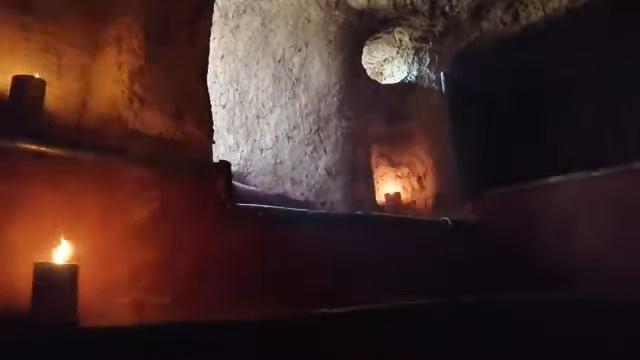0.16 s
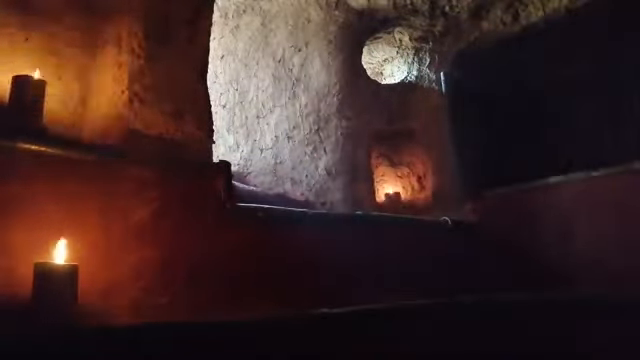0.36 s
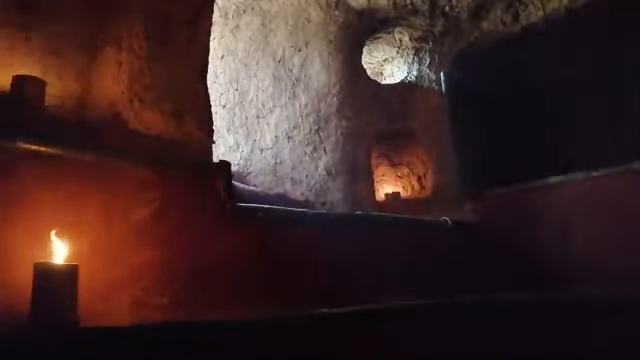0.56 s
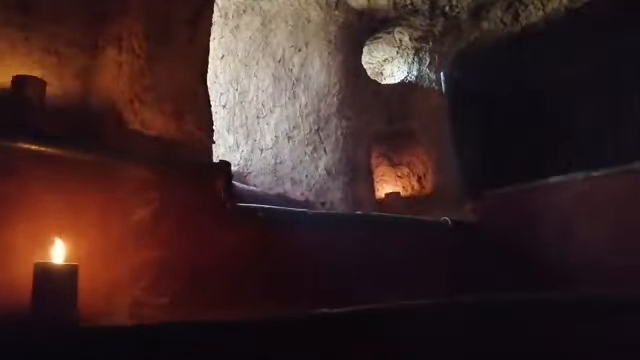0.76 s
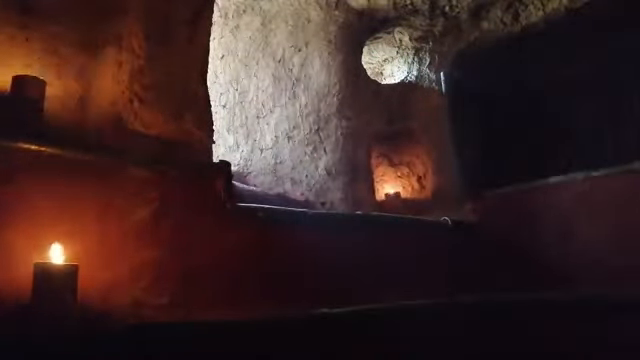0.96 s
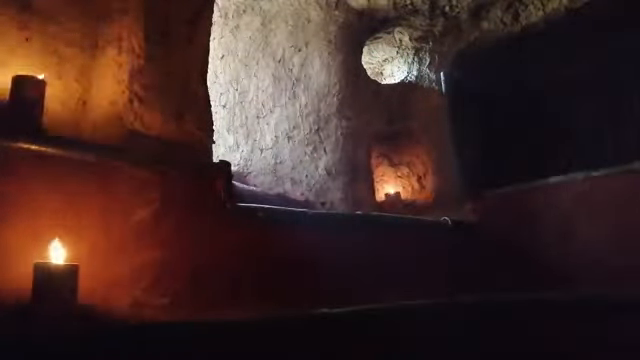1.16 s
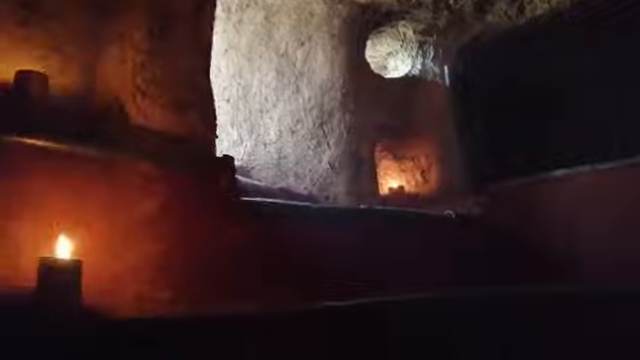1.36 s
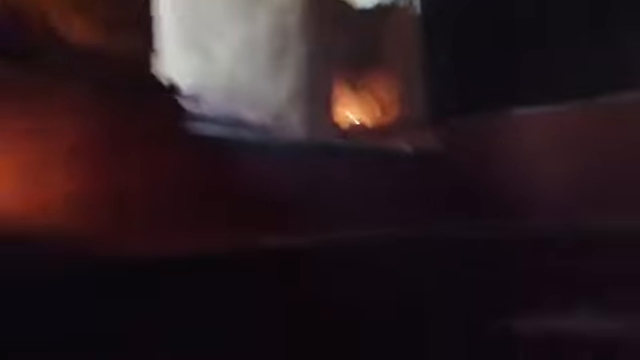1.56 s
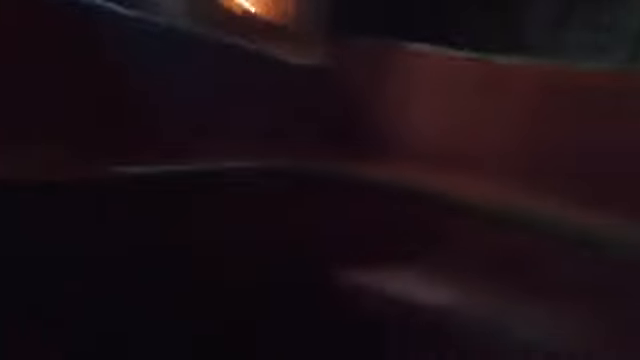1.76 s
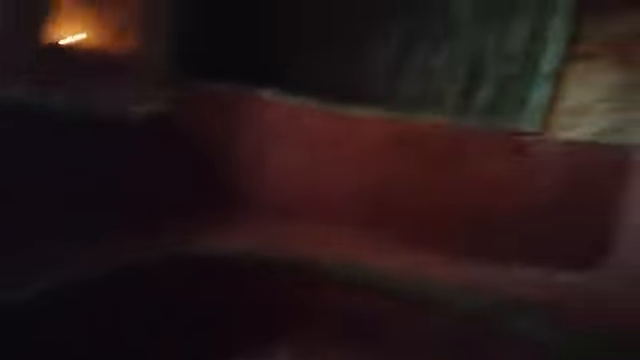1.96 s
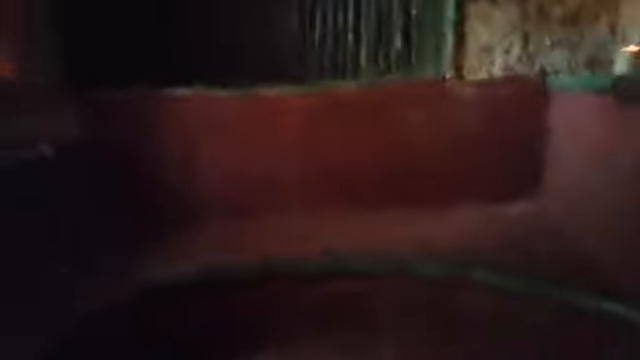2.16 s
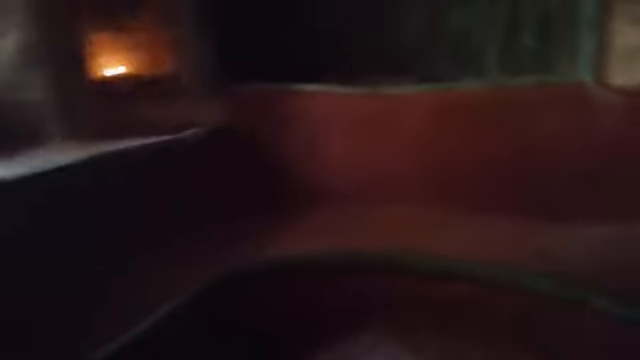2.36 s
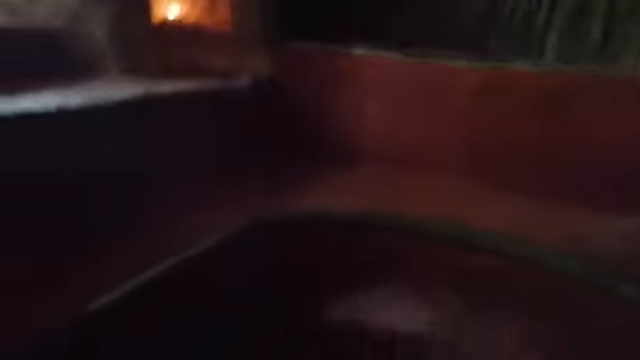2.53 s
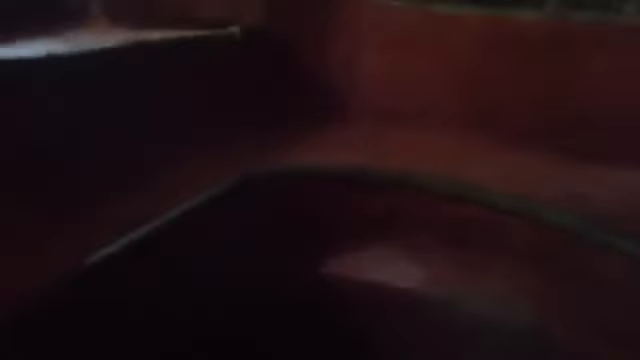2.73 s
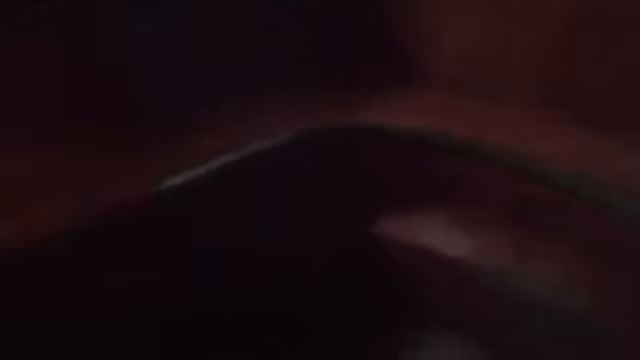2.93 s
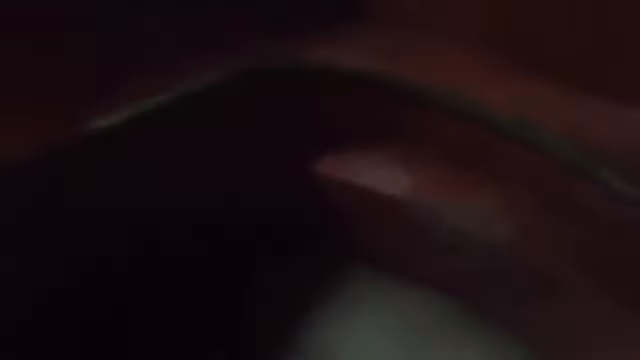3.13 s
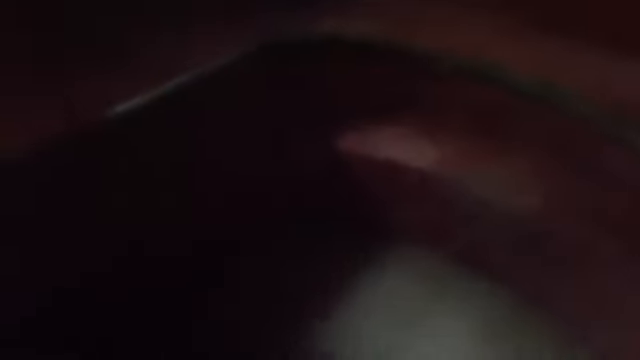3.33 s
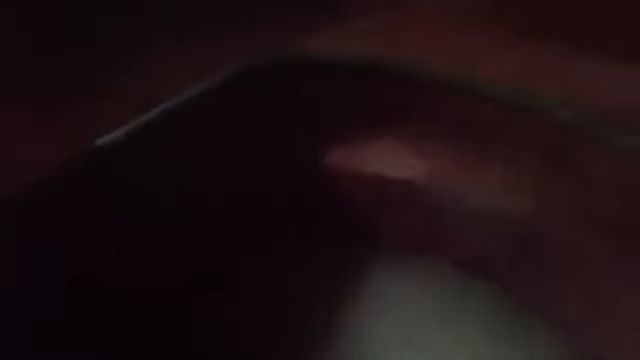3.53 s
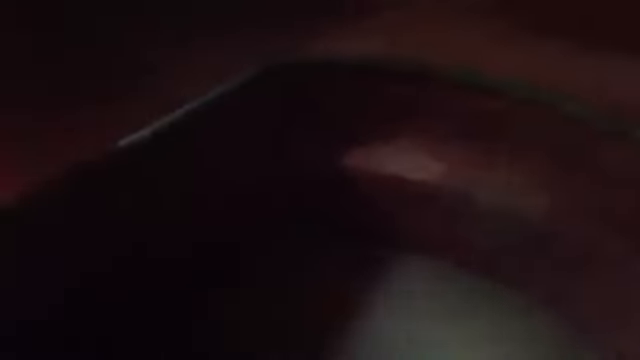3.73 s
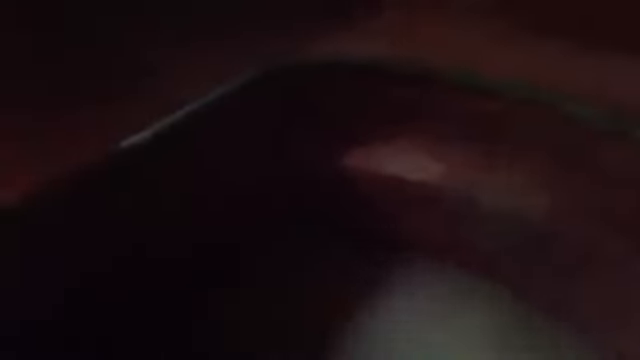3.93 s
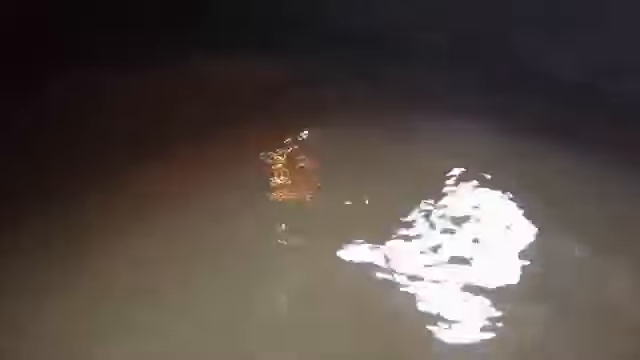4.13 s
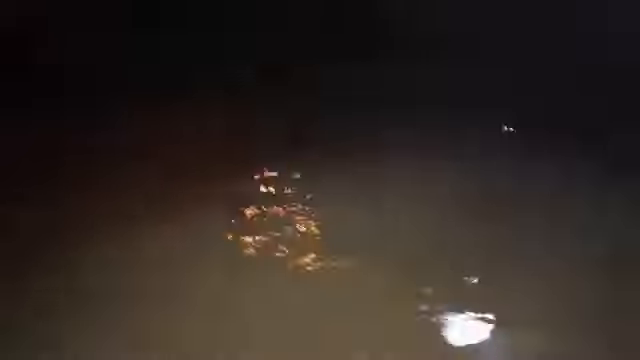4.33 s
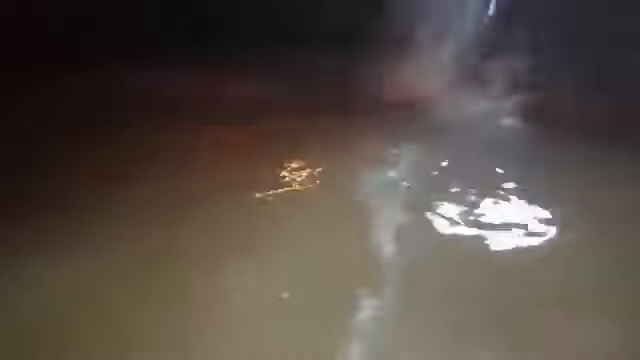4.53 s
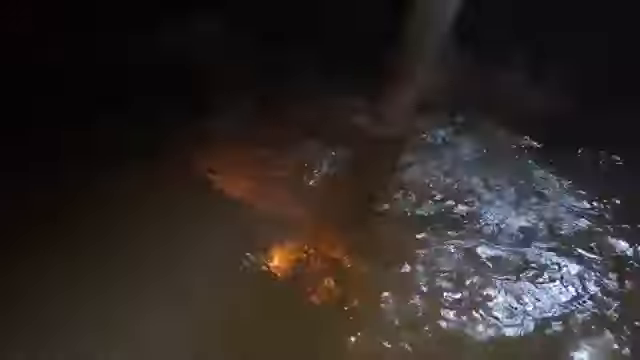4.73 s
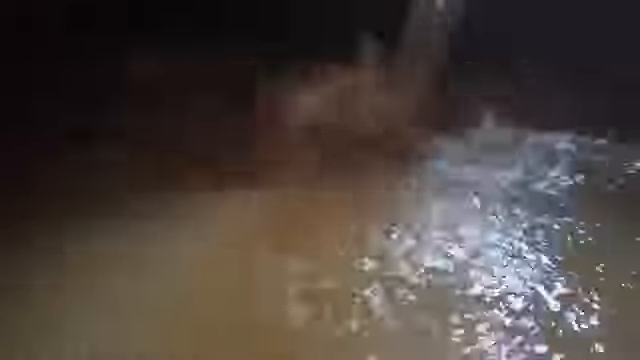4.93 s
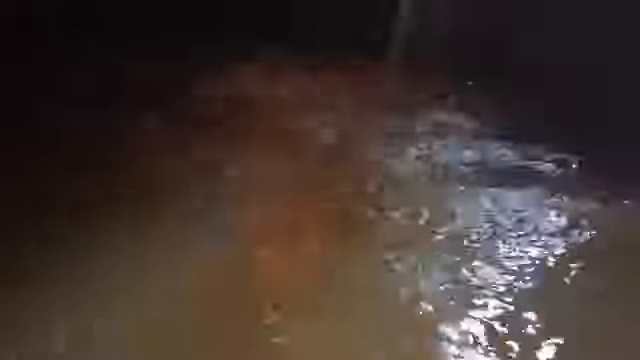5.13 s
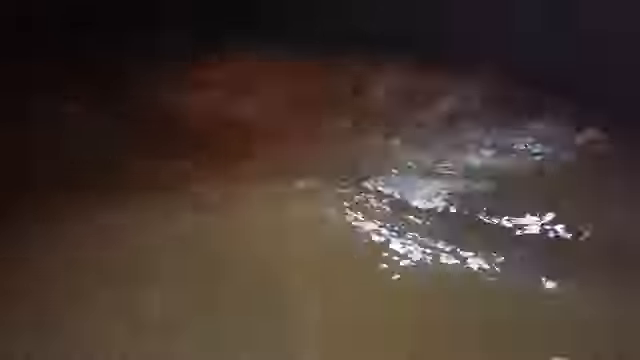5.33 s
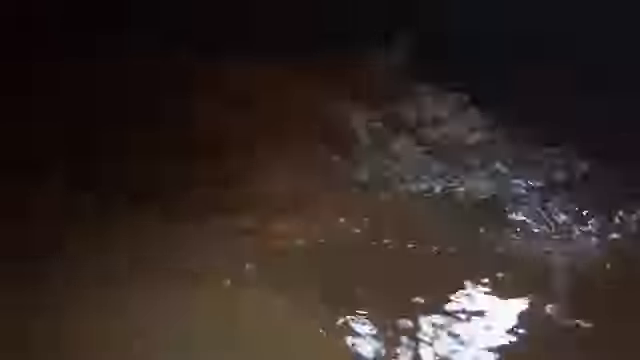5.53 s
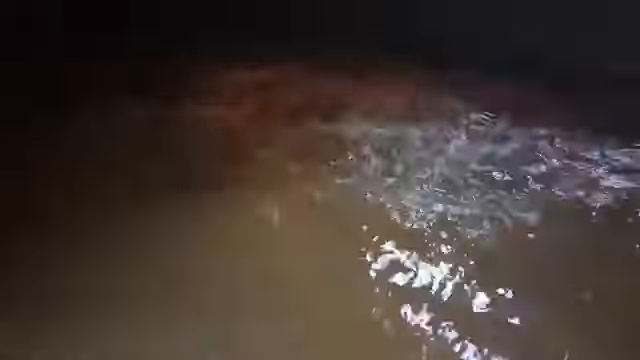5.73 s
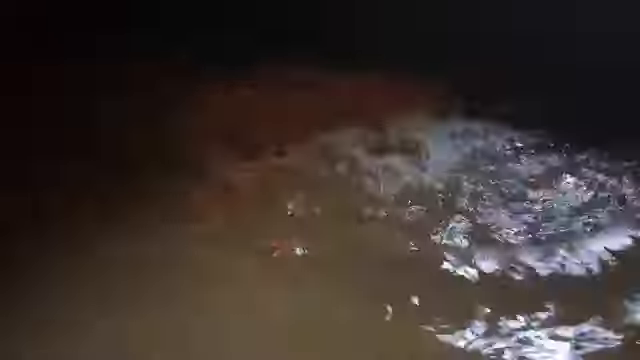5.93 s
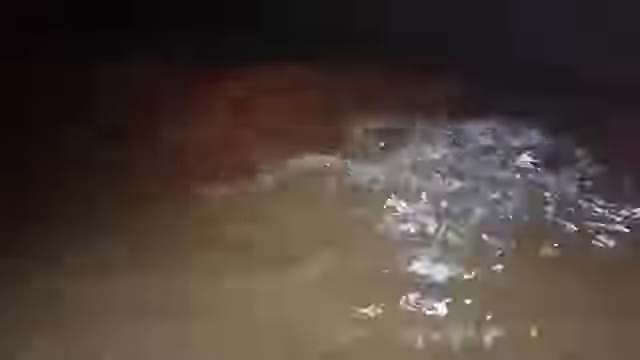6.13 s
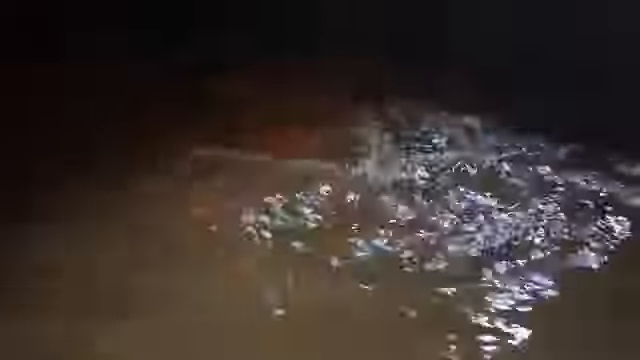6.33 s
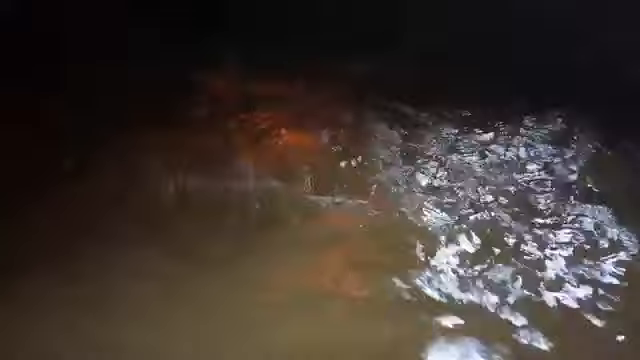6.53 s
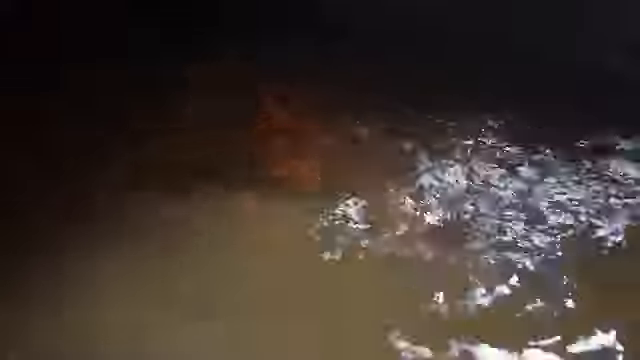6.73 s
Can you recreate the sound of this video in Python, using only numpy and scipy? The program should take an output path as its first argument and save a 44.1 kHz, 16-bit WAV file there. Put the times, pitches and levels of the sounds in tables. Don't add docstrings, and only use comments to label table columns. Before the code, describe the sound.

Close handheld sound in a small, hard stone room. After a quiet start with a faint finger squeak, irregular splashes and rising bubble blips bounce around, with dull handling bumps. A tiny gap of silence follows, then a few drips. Suddenly a dense rush of water lands, deep and gurgling, by far the loudest moment, then falls away quickly to trickles, single plops and soft fizz.

```python
import sys
import numpy as np
from scipy import signal
from scipy.fft import rfft, irfft
from scipy.io import wavfile
from scipy.ndimage import uniform_filter1d

SR = 44100
rng = np.random.default_rng(int(sys.argv[2]) if len(sys.argv) > 2 else 0)


def amplitude_ratio(level_db):
    exponent = np.asarray(level_db, float) / 20
    return 10 ** exponent


def waveform_to_disk(signal):
    frames = np.transpose(np.atleast_2d(signal))
    scaled = np.clip(frames, -1, 1) * 32767
    samples = np.round(scaled).astype(np.int16)
    wavfile.write(sys.argv[1], SR, samples)


N = 303496

# start t/s, hold t/s, bubble level/dB,
# spray over bubbles/dB, favoured f/Hz
STROKES = [(1.264, .06, -57.5, -16, 2000), (1.345, .17, -45.5, -14, 1900), (1.775, 0.09, -44, -13, 1410),
           (1.881, 0.14, -45, -1.5, 1930), (2.051, .19, -46, -0.5, 1850), (2.299, 0.021, -42, -8.5, 1600),
           (2.407, 0.17, -48, 2, 2000), (2.496, 0.027, -42.5, -9, 2700), (2.645, 0.074, -46, -5.5, 2800),
           (2.796, 0.071, -60, 8, 1510), (2.902, 0.051, -53.5, 5.5, 2100),
           (3.004, 0.069, -43.5, -6.5, 1810), (3.146, 0.065, -55.5, 4.5, 2100),
           (3.232, 0.077, -46.5, -2, 2400), (3.495, 0.036, -59, -5, 1900), (3.57, 0.029, -60, 13.5, 2200),
           (3.634, 0.1, -51, 5.5, 2500), (3.78, 0.25, -47, -3.5, 1700), (3.974, 0.092, -41.5, -6.5, 1820),
           (4.375, 0.016, -48, -10.5, 1720), (4.403, 0.29, -58, -4, 2200),
           (5.435, 0.042, -37.5, -5.5, 1500), (5.51, 0.013, -42, 1, 2800),
           (5.714, 0.031, -48.5, -3.5, 1590), (5.619, 0.057, -41, -7.5, 2140),
           (6.025, 0.039, -53.5, -19, 1300), (6.439, 0.088, -59.5, -17, 1200)]
# t/s, level/dB
POUR = [
    (4.54, -44.5),
    (4.572, -29.5),
    (4.62, -23.5),
    (4.98, -23.5),
    (5.05, -28.5),
    (5.43, -28),
    (5.47, -41),
    (5.77, -53),
    (6.02, -62),
]
POUR_START_S = POUR[0][0]
# f/Hz, width/Hz, left-right likeness (0-1)
LOW_MODES = [(52, 20, 0.99), (111.5, 100, 1), (270, 380, 0.28)]
# f/Hz, phase each way/rad
SIDE_PHASE = [(55, 0.059), (75, 0.55), (110, 0.59), (145, 0.3), (350, 0.72)]
# fade start t/s, silence t/s, sound back t/s
SCENE_CHANGE = (3.992, 4.036, 4.11)
ATTACK_S = 0.011
DIE_DB_PER_S = 261


def evened(x):
    return x / np.sqrt(np.mean(x ** 2) + 1e-20)


def read(points, hz):
    f, value = np.transpose(points)
    return np.interp(np.log(hz + 1), np.log(f + 1), value)


def follow(tables, t):
    rows = np.vstack(tables)
    s, *columns = rows[np.argsort(rows[:, 0])].T
    return [np.interp(t, s, c) for c in columns]


def during(table, t):
    outside = (t < table[0][0]) | (t > table[-1][0] + .01)
    return np.where(outside, -200, follow([table], t)[0])


def add(mix, s, pan_db, sound):
    part = mix[:, round(s * SR):][:, :sound.shape[-1]]
    part += amplitude_ratio(np.array([[pan_db / 2], [-pan_db / 2]])) * sound[..., :part.shape[1]]


def churn(per_s=140, cycles=22, spread_db=3.5, favour_db=11.0, favour_octaves=0.41, clump_db=7.0, wet_db=-1.5):
    # f/Hz, density/(dB per Hz)
    cloud = [(260, -39), (450, -9), (680, -5.5), (1050, -4.5), (1480, -11), (1690, -8.5), (2700, -8),
             (3400, -9), (4570, -11.5), (5610, -12), (8460, -18.5), (11300, -18), (12100, -26.5),
             (15000, -46)]
    # t/s, scatter (0-1)
    scatter_curve = [
        (0, 0.05),
        (1.6, 0.14),
        (1.8, 1.01),
        (4.45, 0.51),
        (4.6, 0.26),
        (5.36, 0.26),
        (5.47, 0.77),
        (5.6, 0.42),
        (5.9, 0.57),
        (6.88, 0.22),
    ]
    pitches = np.geomspace(450, 14000, 50)
    coarse = np.arange(0, N + 256, 256) / SR
    scatter, = follow([scatter_curve], coarse)
    near = np.log2(pitches[:, None] / activity(coarse)[1]) / favour_octaves
    clumps = uniform_filter1d(rng.standard_normal(near.shape), size=2, axis=0)
    clumps = evened(uniform_filter1d(clumps, size=7, axis=1))
    share_db = favour_db * scatter * np.exp(-near ** 2 / 2) + clump_db * scatter * clumps
    weight = amplitude_ratio(share_db + read(cloud, pitches)[:, None]) * np.sqrt(pitches[:, None])
    group = np.searchsorted([1250, 2600, 4000], pitches)
    for g in range(4):
        weight[group == g] /= np.linalg.norm(weight[group == g], axis=0)
    rarity = -np.log(np.linspace(.01, 1, 100))
    weight /= np.sqrt(np.mean(amplitude_ratio(2 * spread_db * scatter[:, None] * rarity), axis=1))

    swarms = np.zeros((4, 2 * N + SR))
    for hz, w, g in zip(pitches, weight, group):
        where, side, chance, luck = rng.random((4, int(N / SR * 1500)))
        born = chance < per_s * np.sqrt(hz / 1000) / 1500
        s = where[born] * N / SR
        size_db = -spread_db * np.interp(s, coarse, scatter) * np.log(np.maximum(luck[born], .01))
        size = amplitude_ratio(size_db) * np.interp(s, coarse, w)
        ring = bubble(hz, .4, cycles / hz)
        at = (s * SR).astype(int) + N * (side[born] > .5)
        sound = np.outer(size, ring) / np.linalg.norm(ring) / np.sqrt(len(s) + 1)
        index = at[:, None] + np.arange(len(ring))
        swarms[g] += np.bincount(index.ravel(), sound.ravel(), swarms.shape[1])
    swarms = swarms[:, :2 * N].reshape(4, 2, N)

    fine = np.arange(0, N + 96, 96) / SR
    large, middle, spray = activity(fine)[0]
    sizes_db = [large, middle, (middle + spray) / 2, spray]
    out = np.zeros((2, N))
    for db, trim_db, x in zip(sizes_db, [6.5, 0.5, -2.0, 0.5], swarms):
        level_db = np.interp(np.arange(N) / SR, fine, db + trim_db)
        out += amplitude_ratio(level_db) * evened(x + amplitude_ratio(wet_db) * room(x))
    return out


def activity(t):
    # start t/s, hold t/s, level/dB
    laps = [
        (0, 0.036, -65.5),
        (0.192, 0.047, -71),
        (0.588, 0.21, -74.5),
        (0.976, 0.28, -70.5),
        (1.75, 0.026, -63.5),
    ]
    # t/s, level/dB
    foam_curve = [
        (5.5, -56),
        (5.84, -54.5),
        (6.45, -60),
        (6.7, -69.5),
        (6.88, -71),
    ]
    lap_spray_db, lap_hz, still_db = -1.5, 2100, -83
    spray_die_db_per_s, large_lag_s = 205, 0.041
    early_s, early_large_db = 1.6, 8
    still = still_db + 0 * t
    parts = [(still - 3.5, still, still, lap_hz)]
    for s, hold, db, spray_db, hz in STROKES + [(s, hold, db, lap_spray_db, lap_hz) for s, hold, db in laps]:
        large_db = db - 20.5 + early_large_db * (s < early_s) - np.log2(hz / 1500)
        large = large_db + stroke(t, s, hold, DIE_DB_PER_S, large_lag_s)
        middle = db + stroke(t, s, hold, DIE_DB_PER_S)
        spray = db + spray_db + stroke(t, s, hold, spray_die_db_per_s)
        parts.append((large, middle, spray, hz))

    flow, foam = during(POUR, t), during(foam_curve, t)
    age = t - POUR_START_S
    lead = np.exp(-abs(age) / 0.14)
    pour_large = flow - 5 - 4.5 * age - 15 * lead
    parts.append((pour_large, flow, flow - 9.5 + 14.5 * lead, 1650))
    foam_spray = -55.5 + 0.43 * (foam - foam_curve[0][1])
    parts.append((foam - 17.5, foam, foam_spray, 2300))

    power = amplitude_ratio(2 * np.array([p[:3] for p in parts]))
    favoured_hz = np.array([p[3] for p in parts]) @ power[:, 1] / power[:, 1].sum(0)
    return 10 * np.log10(power.sum(0)), favoured_hz


def stroke(t, start, hold, die, attack=ATTACK_S):
    jump_db, gather_db_per_s, sink_db_per_s = 10.5, 503.5, 3
    age = t - start
    rise = -jump_db * np.clip(1 - age / attack, 0, 1) + gather_db_per_s * np.minimum(age, 0)
    db = rise - sink_db_per_s * np.clip(age, 0, hold) - die * np.maximum(age - hold, 0)
    return np.where((start < SCENE_CHANGE[1]) & (t > SCENE_CHANGE[1]), -200, db)


def bubble(hz, rise, t60):
    t = np.arange(int(t60 * SR) + 8) / SR
    turns = np.cumsum(np.minimum(hz * 2 ** (rise * t / t60), 16000)) / SR
    return np.sin(2 * np.pi * turns) * amplitude_ratio(-60 * t / t60) * (1 - np.exp(-t * hz / 1.36))


def surge():
    # t/s, peak level/dB, f/Hz, swell t/s, length t/s
    gulps = [(4.619, -30.5, 356, 0.035, 0.21), (4.63, -27, 141.5, 0.042, 0.13),
             (4.636, -29, 177.6, .04, 0.19), (4.93, -30.5, 177, .03, 0.2), (4.8, -28.5, 101, 0.026, 0.14),
             (4.92, -19, 142.4, 0.036, 0.23), (5.21, -31, 180, 0.04, 0.16),
             (5.25, -30.5, 141.2, 0.066, 0.52), (5.407, -22, 53.8, 0.047, 0.25),
             (5.501, -31, 182.7, 0.017, 0.29), (5.502, -33, 78, 0.046, 0.18),
             (5.412, -28, 131, 0.015, 0.031)]
    hz, out = np.fft.rfftfreq(N, 1 / SR), np.zeros((2, N))
    coarse = np.arange(0, N + 128, 128) / SR
    turn = np.exp(1j * np.outer([-1, 1], read(SIDE_PHASE, hz)))
    for (f, width, same), db in zip(LOW_MODES, heave(coarse)):
        left, other = rng.standard_normal((2, N))
        same = np.clip(same, 0, 1)
        push = rfft([left, same * left + np.sqrt(1 - same ** 2) * other]) * turn
        boom = evened(irfft(push / (1 + (2 * (hz - f) / width) ** 4), N))
        out += amplitude_ratio(np.interp(np.arange(N) / SR, coarse, db)) * boom
    for s, db, f, swell, length in gulps:
        add(out, s, 0, amplitude_ratio(db) * gulp(f, swell, length))
    return out


def heave(t):
    # peak t/s, level/dB, centre f/Hz, swell t/s
    heaves = [(1.52, -47.5, 240, 0.093), (2.18, -38, 71, 0.044), (2.34, -59, 180, 0.3),
              (2.73, -46, 242, 0.23), (3.06, -44.5, 200, 0.13), (3.16, -56, 150, 0.11),
              (3.72, -62, 60, 0.23), (3.72, -68, 300, 0.056), (3.9, -57.5, 110, 0.073),
              (3.99, -64, 302, 0.1), (4.15, -67, 101, 0.088), (2.98, -48.5, 110, .06),
              (1.4, -48, 100, 0.11), (4.899, -33.5, 264, 0.18), (4.97, -34.5, 95, 0.051),
              (5.158, -36.5, 55, 0.092), (5.42, -34.5, 60, 0.084), (5.42, -36.5, 270, 0.041),
              (5.56, -36.5, 80.5, 0.17), (3.2, -52, 45, .6), (5.62, -37.5, 120, 0.23),
              (5.76, -49.5, 110, 0.27)]
    rests_db, settled_all_db = (-72.5, -63, -81.5), (-11, -2.5, 1)
    stirs_db, pours_db = (-15.5, -33.5, -19), (-37, -15, -13.5)
    swell_db, settle_db_per_s, reach_db = 15, 208.5, 7
    stir = sum(amplitude_ratio(2 * (db + stroke(t, s, hold, DIE_DB_PER_S))) for s, hold, db, _, _ in STROKES)
    wobble_db = 3 * evened(uniform_filter1d(rng.standard_normal(len(t)), size=40))
    lag_db = -40 * np.exp(-abs(t - POUR_START_S) / 0.05)
    levels = []
    for (f, _, _), rest_db, settled_db, stir_db, pour_db in zip(LOW_MODES, rests_db, settled_all_db,
                                                                stirs_db, pours_db):
        power = amplitude_ratio(2.04 * (rest_db + wobble_db + settled_db * (t > SCENE_CHANGE[1])))
        power = power + stir * amplitude_ratio(2 * stir_db)
        power = power + amplitude_ratio(2 * (during(POUR, t) + pour_db + lag_db))
        for s, db, hz, swell in heaves:
            settle = stroke(t, s - ATTACK_S, ATTACK_S, settle_db_per_s)
            shape = np.where(t < s, swell_db * (t - s) / swell, settle)
            shape = np.where((s > POUR_START_S) & (t < POUR_START_S), -200, shape)
            power = power + amplitude_ratio(2 * (db + shape - reach_db * np.log2(f / hz) ** 2))
        levels.append(10 * np.log10(power))
    return levels


def gulp(hz, swell, length):
    t = np.arange(int(length * SR)) / SR
    shape = np.interp(t, [0, swell, length], [0, 1, 0]) ** 1.6
    waver = np.sin(2 * np.pi * (11 * t + rng.random()))
    phase = read(SIDE_PHASE, hz) * np.array([[-1], [1]])
    return shape * (1 + 0.081 * waver) * np.sin(2 * np.pi * hz * t + 0.1 * waver + phase)


def drops():
    wet, body = np.zeros((2, 2, N))
    single_bubbles(wet)
    bubble_strings(wet)
    spray_ticks(wet)
    knocks(body)
    squeak(wet)
    cut = round(SCENE_CHANGE[1] * SR)
    echo = np.hstack([room(wet[:, :cut]), room(wet[:, cut:])])
    return wet + amplitude_ratio(-3.5) * echo + amplitude_ratio(3.0) * body + amplitude_ratio(7.0) * room(body)


def single_bubbles(mix):
    # t/s, peak level/dB, f/Hz, t60/s
    large = [(1.805, -29.5, 1340, 0.063), (1.835, -24.5, 1175, 0.061), (1.93, -33.5, 1500, 0.092),
             (2.129, -32, 1407, 0.072), (2.524, -30.5, 1354, 0.079), (3.494, -52.5, 1055, 0.062),
             (3.819, -37.5, 1150, 0.068), (3.94, -50, 620, 0.041), (4.367, -41.5, 1210, 0.072),
             (4.568, -23, 1383, 0.07), (6.029, -59, 767, 0.095), (5.67, -34.5, 1093, 0.077),
             (5.746, -41, 1330, 0.023), (6.515, -50, 930, .05)]
    close_pitched = [
        (3.303, -36.5, 848, 0.07),
        (3.858, -29.5, 1310, .045),
        (2.783, -37, 1030, .05),
        (6.448, -49, 1135, 0.055),
    ]
    climbing = [
        (2.413, -30.5, 623, 0.06),
        (2.788, -34.5, 1026, 0.06),
        (3.798, -30.5, 884, 0.063),
        (3.859, -32, 1300, 0.05),
        (5.562, -40, 588, 0.066),
        (6.05, -35, 770, 0.041),
        (6.455, -46, 1174, 0.092),
    ]
    small = [(1.699, -54.5, 2420, 0.05), (1.7836, -28.5, 1690, 0.038), (2.0679, -22.5, 1800, 0.029),
             (2.2084, -37.5, 3870, 0.054), (2.236, -28, 2620, 0.039), (2.2962, -27, 2010, 0.047),
             (2.305, -31, 3690, 0.042), (2.531, -22, 2650, 0.022), (2.663, -30.5, 2860, 0.05),
             (2.9629, -32.5, 1772, 0.058), (3.0451, -18, 1760, 0.019), (3.231, -32.5, 1850, 0.023),
             (3.5342, -33.5, 1886, 0.034), (3.5688, -44, 2040, 0.059), (3.6106, -29, 2220, 0.03),
             (3.646, -29, 2610, 0.044), (3.722, -33.5, 2220, 0.048), (3.7963, -36.5, 1974, 0.062),
             (3.852, -30, 3690, 0.041), (3.894, -26, 1817, 0.05), (4.27, -50, 1580, 0.049),
             (4.399, -38.5, 2310, 0.055), (4.5236, -38, 1870, 0.044), (6.32, -42, 1840, 0.031),
             (5.636, -15.5, 4990, 0.0088), (1.353, -30, 2340, 0.019), (2.53, -27, 3900, 0.012),
             (5.655, -30, 2410, 0.046), (5.743, -34.5, 2380, 0.054)]
    cluster(mix, large, rise=0.26, loose=.35)
    cluster(mix, close_pitched, rise=0.25, loose=0.13)
    cluster(mix, climbing, rise=1.14, loose=0.61)
    cluster(mix, small, rise=0.32, loose=0.53)


def cluster(mix, rows, rise, loose):
    for (s, db, hz, t60), luck in zip(rows, rng.random((len(rows), 3, 3))):
        add(mix, s, 4.5 * (luck[0, 0] - .5), amplitude_ratio(db - 3.5) * bubble(hz, rise, t60))
        for late, off, side in luck[1:]:
            neighbour = bubble(hz * 2 ** (loose * (off - .3)), rise, 0.56 * t60)
            add(mix, s + (0.11 + .4 * late) * t60, 10.0 * (side - .5), amplitude_ratio(db - 9.5) * neighbour)


def bubble_strings(mix):
    # start t/s, level/dB, first f/Hz, last
    # f/Hz, length t/s
    drifting_strings = [(1.676, -55, 1100, 1120, .04), (2.487, -46, 706, 595, 0.091),
                        (3.094, -55, 780, 745, 0.093), (1.344, -54, 1100, 810, 0.18),
                        (1.357, -53, 609, 600, 0.15), (1.877, -43, 1150, 1090, 0.082),
                        (3.011, -44, 1200, 990, 0.077), (5.629, -39, 1100, 990, 0.087),
                        (1.8, -40.5, 800, 900, 0.076), (1.86, -30, 1540, 2100, .12),
                        (2.112, -35, 1300, 1710, 0.054), (2.22, -41, 1420, 1330, 0.057),
                        (2.311, -40, 920, 1310, 0.047), (2.415, -34.5, 770, 1410, 0.039),
                        (2.466, -38, 2400, 2700, .06), (2.666, -40.5, 2400, 2800, 0.074),
                        (2.799, -48, 1300, 1710, 0.038), (2.811, -34.5, 5270, 5600, 0.025),
                        (2.926, -48, 1720, 1800, .06), (3.59, -31, 2100, 2760, .09),
                        (3.786, -37.5, 910, 1310, .05), (3.92, -36, 1810, 2000, .07),
                        (4.256, -56, 1700, 1403, .04), (4.365, -50, 1010, 1010, 0.049),
                        (4.368, -50, 1600, 1610, 0.06), (3.936, -47, 596, 720, .05), (2.09, -45, 900, 600, .05),
                        (3.7, -38, 2200, 2600, 0.049), (3.95, -36, 1980, 2400, 0.039),
                        (3.975, -37, 1205, 1300, .018), (1.828, -35, 1160, 1350, .05),
                        (5.44, -29, 1500, 1610, .05), (4.61, -20, 2490, 2460, 0.056),
                    (4.633, -16, 2010, 1800, 0.051), (4.81, -21.5, 542, 700, 0.034),
                    (4.9, -24, 990, 1100, .1), (5.26, -22, 2400, 2400, 0.048),
                    (5.563, -37.5, 590, 780, .035), (5.693, -39, 1400, 1650, .07),
                    (5.95, -55.5, 1050, 1050, .03), (6.035, -42.5, 690, 990, .06),
                    (6.046, -41.5, 1190, 2000, .04), (6.2, -62, 1000, 1000, 0.038),
                    (6.285, -48, 1710, 1780, 0.062), (6.444, -51, 1100, 1480, .05)]
    streaks = [(2.098, -43, 614, 593, .115), (2.084, -50, 567, 640, .03), (2.528, -49, 1345, 1280, 0.076),
               (3.613, -48, 960, 890, 0.055), (3.831, -44, 936, 960, 0.037),
               (4.598, -22.5, 767, 738, 0.089), (4.685, -25, 760, 614, 0.034),
               (4.742, -28.5, 690, 670, 0.064), (4.768, -18, 1660, 1650, .14), (4.907, -28, 618, 626, .035),
               (5.069, -16.5, 1655, 1690, .13), (4.567, -29, 1400, 1400, .03),
               (5.049, -27.5, 690, 690, .15), (5.197, -32, 598, 640, .07), (5.259, -22.5, 1650, 1650, .07),
               (5.428, -38, 650, 690, .07), (6.513, -53.5, 932, 990, .035), (3.315, -52.5, 860, 850, .05),
               (3.37, -53.5, 3800, 3800, .05), (2.946, -45, 1780, 1800, .04),
               (5.13, -24.5, 1690, 1690, .08), (6.043, -49, 715, 796, .07), (6.45, -49, 1150, 1200, .035)]
    gurgle(mix, drifting_strings, spread=0.42, cycles=27.6, count=12)
    gurgle(mix, streaks, spread=0.065, cycles=40.0, count=12)


def gurgle(mix, rows, spread, cycles, count):
    for (s, db, first, last, length), luck in zip(rows, rng.random((len(rows), count, 4))):
        for k, (late, off, side, size) in enumerate(luck):
            u = (k + late) / count
            hz = first * (last / first) ** u * 2 ** (spread * (off - .5))
            level = amplitude_ratio(db + 7.8 * (size - .5) - 5.8 * u)
            add(mix, s + u * length, 21.0 * (side - .5), level * bubble(hz, 0.27, cycles / hz))


def spray_ticks(mix):
    # t/s, peak level/dB, centre f/Hz, t60/s
    ticks = [(1.353, -33.5, 3500, 0.015), (1.508, -24.5, 1750, 0.016), (1.836, -27.5, 2000, 0.015),
             (1.7821, -25.5, 1940, 0.0099), (1.902, -27, 4120, 0.019), (1.9312, -26, 1650, 0.04),
             (2.058, -27, 6000, 0.035), (2.2956, -25, 2530, 0.017), (2.3915, -58, 4000, .03),
             (2.444, -24.5, 4730, 0.058), (2.531, -18.5, 3180, 0.04), (2.665, -20, 3500, 0.017),
             (2.8196, -31, 6300, 0.018), (2.9115, -28, 4120, 0.019), (3.0145, -27, 1800, 0.016),
             (3.046, -24.5, 2300, 0.032), (3.121, -35.5, 8960, 0.037), (3.1624, -31, 4320, 0.04),
             (3.23, -28.5, 2500, 0.024), (3.2994, -23.5, 4400, 0.055), (3.399, -37.5, 4800, 0.022),
             (3.503, -43.5, 7560, 0.041), (3.5163, -32.5, 3640, 0.028), (3.569, -33, 3520, 0.029),
             (3.677, -29, 4750, 0.062), (3.868, -30, 9300, 0.033), (4.368, -39.5, 2920, 0.035),
             (4.539, -21, 7480, 0.015), (5.408, -19.5, 2200, 0.14), (5.5115, -24, 3300, 0.056),
             (5.636, -18, 4850, 0.018), (1.752, -46, 4000, 0.022), (3.61, -28, 3500, 0.011),
             (3.165, -33, 2500, .014), (3.6487, -30, 6000, 0.012), (3.9784, -31.5, 7430, 0.028),
             (5.209, -18, 5000, .02), (4.5659, -16.5, 5000, 0.022), (1.138, -46.5, 1500, 0.034),
             (3.8537, -32, 3700, .02), (2.3057, -31, 5000, 0.023)]
    for s, db, hz, t60 in ticks:
        add(mix, s, 0, amplitude_ratio(db) * slap(hz, 0.42 * np.sqrt(0.032 / t60), t60))


def slap(hz, octaves, t60):
    t, f = np.arange(4096) / SR, np.fft.rfftfreq(4096, 1 / SR) + 1
    colour = np.exp(-(np.log2(f / hz) / octaves) ** 2 / 2)
    colour = colour + 0.27 / (1 + (1500 / f) ** 4 + (f / 9000) ** 3)
    spray = evened(irfft(rfft(rng.standard_normal((2, 4096))) * colour))
    return 0.58 * spray * amplitude_ratio(-60 * t / t60) * (1 - np.exp(-t / 0.0009))


def knocks(mix):
    # t/s, peak level/dB, f/Hz, t60/s
    knock_rows = [
        (1.5069, -25, 232, 0.013),
        (2.872, -48, 248, 0.037),
        (1.438, -36.5, 248, 0.019),
        (2.174, -22, 109.5, 0.03),
        (2.321, -23.5, 242, 0.011),
        (2.703, -42, 223, 0.11),
        (3.043, -19.5, 239, 0.014),
        (3.167, -38, 248, 0.02),
        (3.687, -54.5, 301, 0.092),
    ]
    for s, db, hz, t60 in knock_rows:
        add(mix, s, 0, amplitude_ratio(db + 9.0) * bubble(hz, -0.18, t60))


def squeak(mix):
    # t/s, level/dB, f/Hz
    path = [
        (1.02, -76, 661),
        (1.062, -65.5, 714),
        (1.11, -66, 701),
        (1.165, -69, 690),
    ]
    harmonics_db = [12, 1, 9, -6, -3]
    t = np.arange(path[0][0], path[-1][0], 1 / SR)
    db, hz = follow([path], t)
    slips = evened(uniform_filter1d(rng.standard_normal(len(t)), size=150))
    flutter = rng.standard_normal((len(harmonics_db), len(t)))
    flutter = evened(uniform_filter1d(flutter, size=900, axis=1))
    turns = np.cumsum(hz * (1 + 0.015 * slips)) / SR
    tone = np.zeros(len(t))
    for k, g in enumerate(harmonics_db, 1):
        tone += amplitude_ratio(g + 3.4 * flutter[k - 1]) * np.sin(2 * np.pi * k * turns)
    add(mix, t[0], 0, amplitude_ratio(db - 12.5 + 4.8 * slips) * tone)


def basin(x):
    # f/Hz, width/Hz, lift/dB
    modes = [(690, 27, 3.5), (1690, 50, 3.5), (2065, 39, 3), (2530, 45, 2.5)]
    hz = np.fft.rfftfreq(N, 1 / SR)
    gain_db = -3 / (1 + np.exp((11400 - hz) / 200))
    for f, width, db in modes:
        gain_db = gain_db + db / (1 + (2 * (hz - f) / width) ** 2)
    return irfft(rfft(x) * amplitude_ratio(gain_db), N)


def room(x):
    # f/Hz, t60/s
    decay = [(300, 0.067), (1000, 0.2), (4000, 0.14), (12000, 0.099)]
    taps = np.zeros((2, 12000))
    at = np.arange(120, 11900, 20) + rng.integers(0, 20, (2, 589))
    np.put_along_axis(taps, at, rng.choice([-1., 1.], at.shape), 1)
    hz, t, z = signal.stft(taps, SR, nperseg=256)
    tail = signal.istft(z * amplitude_ratio(-60 * t / read(decay, hz)[:, None]), SR, nperseg=256)[1]
    return signal.oaconvolve(x, tail / np.linalg.norm(tail[0]), axes=1)[:, :x.shape[1]]


def hiss():
    # f/Hz, density/(dB per Hz)
    spectrum = [(120, -38.5), (200, 3), (521, -14.5), (683, -13), (2060, -4.5), (4240, -14), (7280, -17),
                (10800, -21.5), (15000, -47.5)]
    hz = np.fft.rfftfreq(N, 1 / SR)
    noise = rfft(rng.standard_normal((2, N))) * amplitude_ratio(read(spectrum, hz))
    return amplitude_ratio(-70.5) * evened(irfft(noise, N))


def scene():
    return basin(churn()) + surge() + drops() + hiss()


def band_limit(x):
    return signal.sosfilt(signal.butter(12, 16360, fs=SR, output="sos"), x)


def record(dry):
    # t/s, left-right level/dB
    camera_turn = [(0.0, 1.5), (1.02, 0), (1.07, 3), (1.21, -0.5), (3.43, 0.5), (3.54, 2), (5.02, -0.5),
                   (5.06, 1), (6.88, 0.5)]
    start, silent, back = SCENE_CHANGE
    t = np.arange(N) / SR
    fade_s = [start, start + 0.0055, silent, silent + .002, back - .02, back]
    fade_db = np.interp(t, fade_s, [0, -49, -69, -36, -0.5, 0])
    pan_db = np.outer([.5, -.5], follow([camera_turn], t)[0])
    top = signal.butter(8, 15000, fs=SR, output="sos")
    return band_limit(signal.sosfilt(top, dry * amplitude_ratio(fade_db + pan_db)))


dry = scene()
out = record(dry)
waveform_to_disk(out)
```